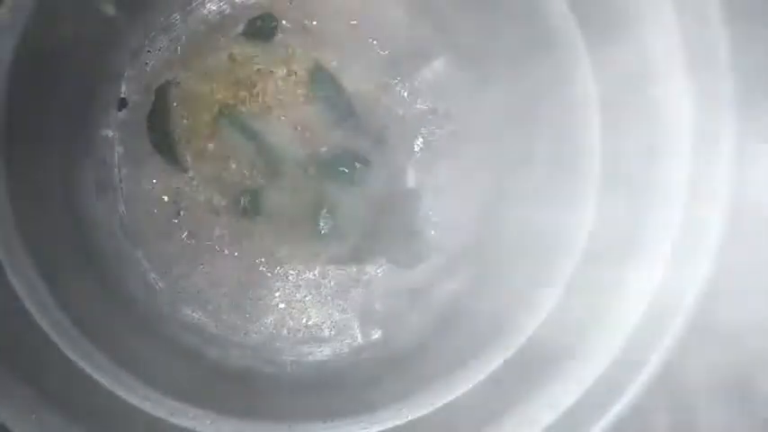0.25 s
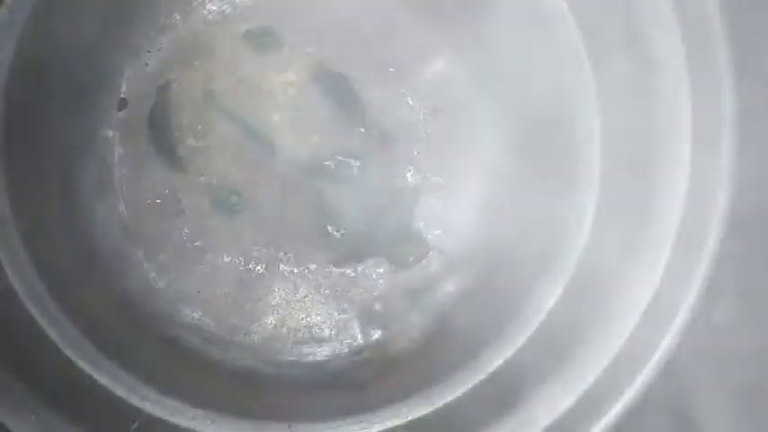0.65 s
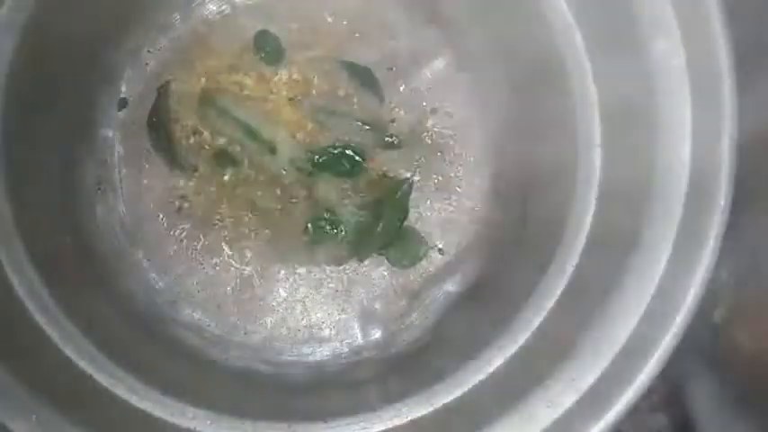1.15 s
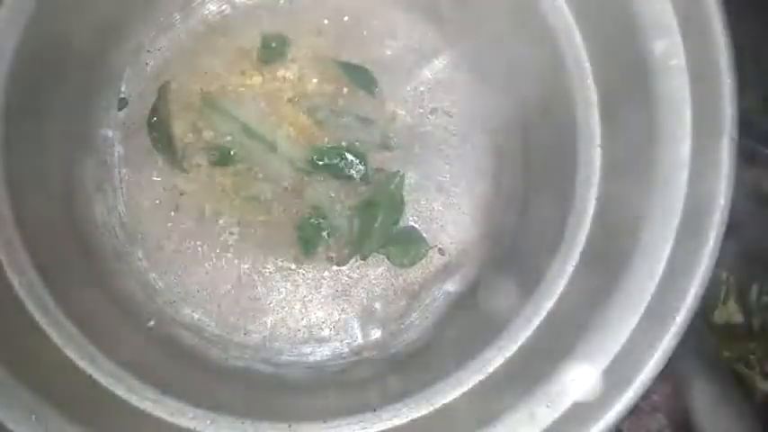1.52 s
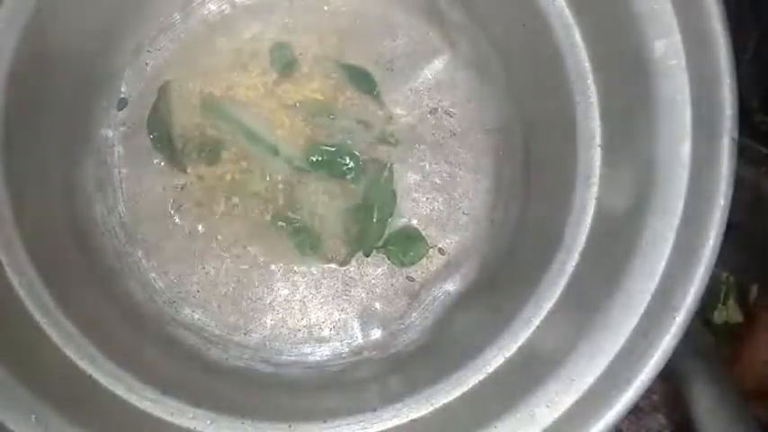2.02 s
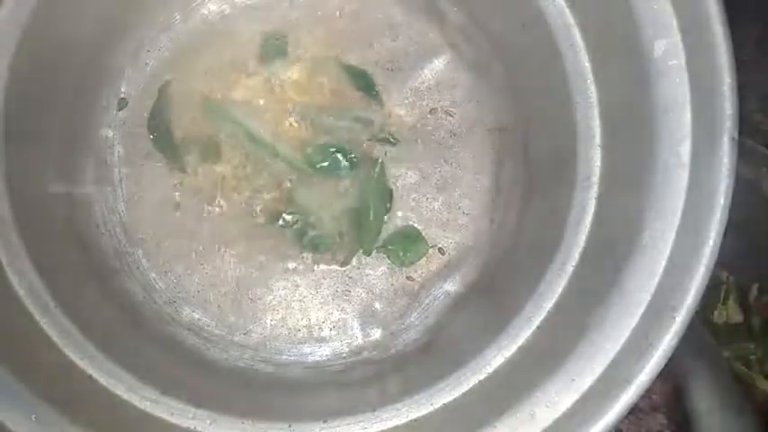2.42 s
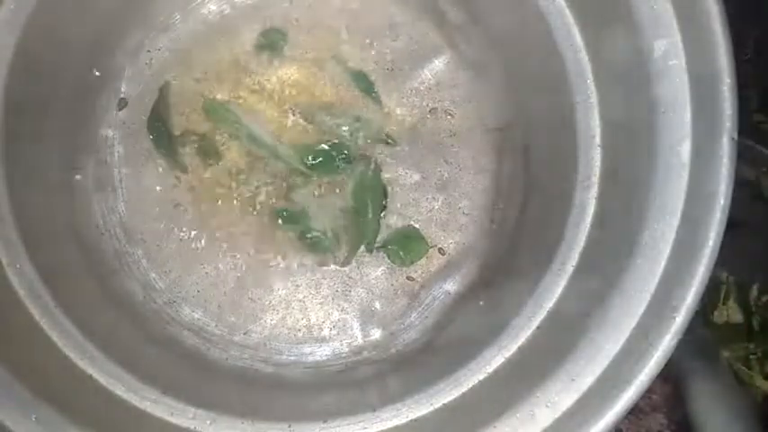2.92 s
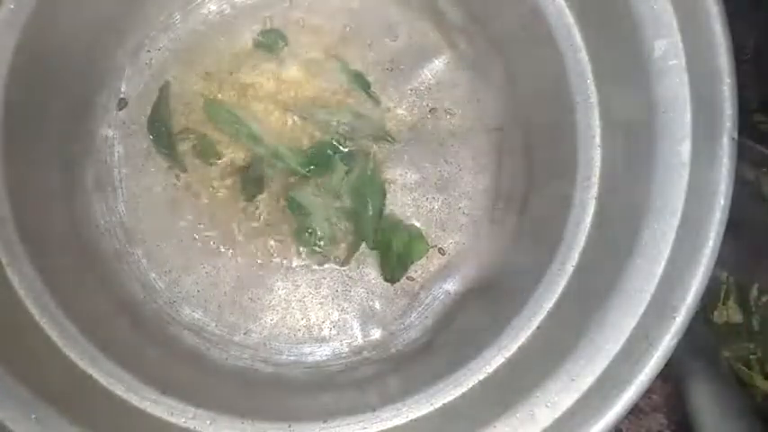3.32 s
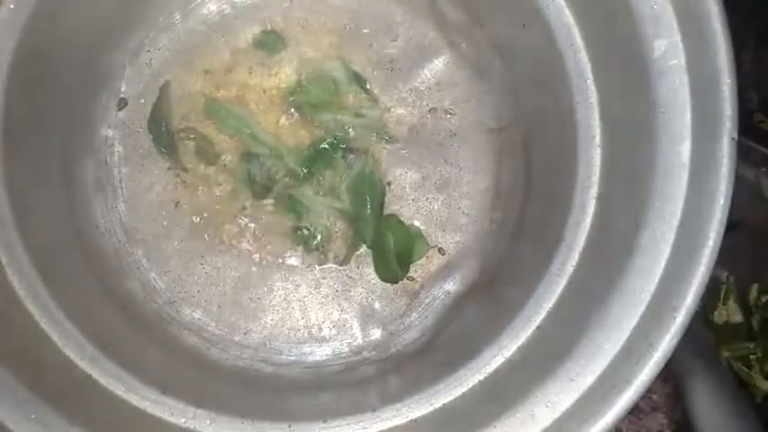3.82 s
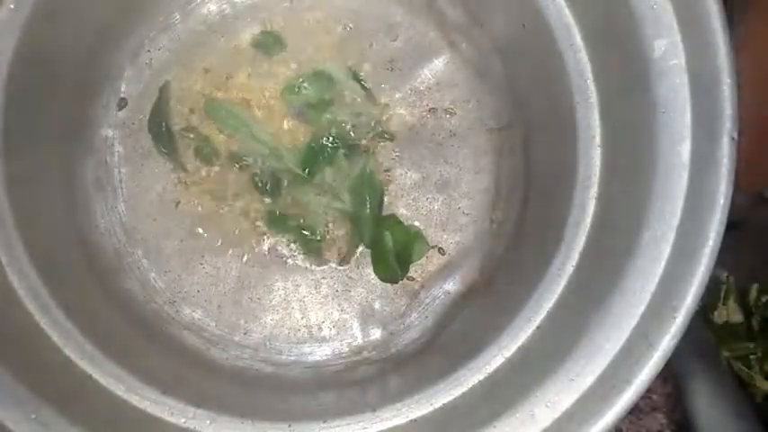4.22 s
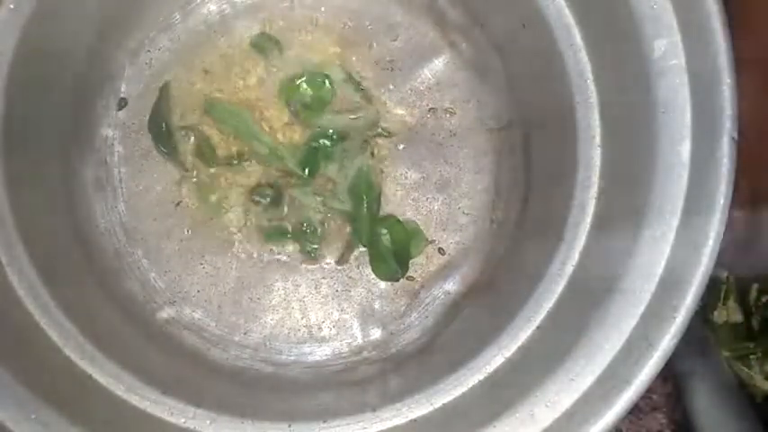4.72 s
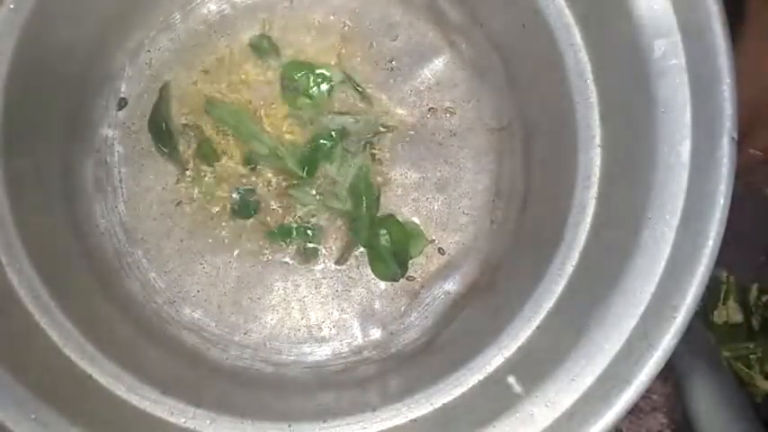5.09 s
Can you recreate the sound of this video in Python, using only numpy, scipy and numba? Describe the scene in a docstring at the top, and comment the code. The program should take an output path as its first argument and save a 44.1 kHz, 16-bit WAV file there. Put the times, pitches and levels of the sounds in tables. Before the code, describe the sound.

Leaves and seeds fry in hot oil at the bottom of a metal pot, popping, crackling and fizzing with hollow ringing bursts.

```python
"""Leaves and seeds fry in a little hot oil at the bottom of a deep metal pot, a phone held above it.
From the start small steam bubbles simmer, over a low kitchen rumble and under a fine treble fizz of droplets.
Soon louder bursts pop one by one: each is a short gliding tone that rings the pot and leaves a swarm
of smaller bubbles. Smaller snaps crackle at random, and now and then a droplet spits: a brief noise puff."""
import sys
import numpy as np
from scipy import signal
from scipy.fft import rfft, irfft
from scipy.io import wavfile
from scipy.ndimage import uniform_filter1d
from numba import njit

SR = 44100
rng = np.random.default_rng(int(sys.argv[2]) if len(sys.argv) > 2 else 0)


def transcribe(u):
    """Save the signal u as a 16-bit wav file named by the first command-line argument.

    u: samples, shape (n,) or (channels, n), limited to [-1, 1]; the rate is SR.
    q: integer samples, one column per channel.
    """
    v = np.clip(np.atleast_2d(u).T, -1, 1)
    q = np.round(v * 32767).astype(np.int16)
    wavfile.write(sys.argv[1], SR, q)


N = 235934

# droplets spat out of the oil: t/s, peak level/dB, middle pitch f/Hz
SPIT_TIMES = [(0.1376, -44, 8550), (0.8779, -54, 14100), (1.3384, -49, 13700), (1.475, -41, 13600),
              (1.7245, -46, 13900), (1.9284, -47, 13500), (2.093, -52, 13900), (2.3236, -44, 10000),
              (2.3476, -39, 13500), (2.7955, -53, 10300), (2.8147, -39, 13400), (2.9672, -46, 12600),
              (2.9866, -46, 13200), (3.0859, -47, 13300), (3.1168, -51, 13550), (3.1522, -36, 14000),
              (3.2656, -53, 13600), (3.2834, -47, 13900), (3.4036, -51, 9440), (3.467, -46, 14100),
              (3.555, -54, 13000), (3.62, -43, 13300), (3.678, -46, 11900), (3.7998, -45, 8200),
              (4.0168, -47, 7710), (4.0726, -45, 13800), (4.1924, -43, 9180), (4.4996, -47, 9240),
              (4.5625, -46, 12360), (4.9267, -54, 13900), (4.9392, -51, 13400), (4.9926, -43.5, 13100),
              (5.0644, -44, 14000), (5.228, -44, 12800)]


def undb(db):
    """Turn decibels into a plain factor."""
    return 10 ** (np.asarray(db) / 20)


def curves(table):
    """Join the points of each table column by straight lines, one value a sample."""
    s, *columns = np.transpose(table)
    return [np.interp(np.arange(N) / SR, s, c) for c in columns]


def colour(x, points):
    """Shape the spectrum by (Hz, dB) points, then scale to rms 1."""
    hz, db = np.transpose(points)
    f = np.arange(len(x) // 2 + 1) * SR / len(x)
    gain_db = np.interp(np.log(f + 1), np.log(hz), db, left=-90)
    y = irfft(rfft(x) * undb(gain_db), len(x))
    return y / y.std()


def walk(rate):
    """Draw a random level every 1 / rate seconds and smooth the steps twice; spread 1."""
    k = int(SR / rate)
    steps = np.repeat(rng.standard_normal(N // k + 1), k)[:N]
    x = uniform_filter1d(uniform_filter1d(steps, k), k)
    return x / x.std()


def band(x, lo_hz, hi_hz):
    """Keep only the sound between two pitches."""
    return signal.sosfilt(signal.butter(2, [lo_hz, hi_hz], "band", fs=SR, output="sos"), x)


@njit
def bubbles(start, size, hz, cycles, glide, n):
    """Each bubble swells, rings for a few cycles while its pitch rises, and dies."""
    out = np.zeros(n)
    for k in range(len(start)):
        tau = cycles[k] / hz[k] * SR / 5  # decay time in samples
        phase, i0 = 0., int(start[k] * SR)
        for i in range(min(int(12 * tau), n - i0)):
            u = i / tau
            phase += 2 * np.pi * hz[k] / SR * (1 + glide[k] * u)
            swell = u * u / 4 * np.exp(2 - u)  # peaks at 1
            out[i0 + i] += size[k] * swell * np.sin(phase)
    return out


def rumble():
    """Burner and kitchen: low noise in three bands that waver on their own."""
    # path of the rumble: t/s, lower bass level/dB, upper bass level/dB (both before wavering)
    rumble_path = [(0.0, -80, -74), (0.37, -76, -78.5), (0.51, -78, -71.5), (0.68, -72, -67.5),
                   (0.83, -65.5, -69), (0.97, -79, -72.5), (1.04, -72, -74), (1.34, -73.5, -72.5),
                   (1.37, -89, -85), (1.7, -72, -65), (2.08, -77.5, -81.5), (2.11, -69, -62.5),
                   (2.29, -81, -76.5), (2.59, -80, -79), (2.77, -71, -76), (2.92, -73, -72),
                   (3.05, -65, -66.5), (3.32, -75, -73), (3.75, -62, -69.5), (3.83, -78, -77.5),
                   (4.8, -77, -77), (4.86, -76.5, -76.5), (5.12, -76.5, -84.5), (5.16, -73.5, -67),
                   (5.35, -75, -69.5)]
    # colour of the noise: f/Hz, level per Hz/dB (relative)
    rumble_colour = [(12, -30), (20, 12), (32, 0), (60, -7), (87, -7), (113, -3), (140, 0.5), (242, -6.5),
                     (289, 1.5), (327, -4.5), (366, -10.5), (400, -49), (520, -40), (880, -120)]
    lower_db, upper_db = curves(rumble_path)
    x = colour(rng.standard_normal(N), rumble_colour)
    deep, lower, upper = band(x, 15, 48), band(band(x, 48, 190), 40, 400), band(x, 180, 400)
    deep = deep / deep.std() * undb(-100 + 2 * walk(3))
    lower = lower / lower.std() * undb(lower_db + 2.5 * walk(12))
    upper = upper / upper.std() * undb(upper_db + 3 * walk(12))
    return deep + lower + upper


def simmer(count=1500, bunch_db=1.1, fine_db_per_oct=-4, fine_drift_db=0.6):
    """Every kind of small bubble bursts a few hundred times a second, louder in bunches, some louder still."""
    # bubbles all over the oil: t/s, level/dB (before the pot, shared by all kinds)
    simmer_path = [(0.0, -54.5), (0.42, -55.5), (0.58, -54.5), (0.68, -58), (0.78, -53), (0.92, -53),
                   (1.05, -58), (1.41, -57.5), (1.65, -58), (2.5, -61), (2.58, -65.5), (2.7, -62),
                   (3.2, -55.5), (3.84, -58.5), (4.47, -61.5), (4.68, -64), (4.96, -59.5), (5.35, -63)]
    # kinds of bubble: middle pitch f/Hz, spread/octaves, relative level/dB before the tilt,
    # size scatter/dB, middle ring/cycles, pitch rise per decay time/share
    bubble_kinds = [(520, .3, -9.5, 3.0, 2.5, .02), (1150, .25, -1, 2.8, 2.5, .02),
                    (1950, .25, -5, 3.6, 3.5, .03), (2800, .17, -4, 4.4, 6.0, .03),
                    (4900, .25, -13, 8.0, 11.0, .012)]
    db, = curves(simmer_path)
    tilt_db = fine_db_per_oct + fine_drift_db * walk(7)  # the share of finer bubbles drifts
    out, together = 0, walk(21.14)
    for middle_hz, spread_oct, kind_db, scatter_db, cycles, glide in bubble_kinds:
        when, length = rng.random((count, 2)).T
        pitch = rng.standard_normal(count)
        loud = np.minimum(rng.exponential(size=count), 4)
        bunch = (together + walk(30))[(when * (N - 1)).astype(int)]
        size = undb(scatter_db * loud + bunch_db * bunch)
        hz = middle_hz * 2 ** (spread_oct * pitch)
        x = bubbles(when * N / SR, size, hz, cycles * (.5 + length), glide + 0 * when, N)
        octaves = np.log2(middle_hz / bubble_kinds[1][0])  # from the second kind
        out = out + x / x.std() * undb(kind_db + tilt_db * octaves)
    return out * undb(db)


def fizz(scatter_db=5.2, smear_s=0.001, steady=6.0, flicker_db=1.2, own_db=1.4, surge_db=1.5, surge_s=0.04):
    """Droplets tick over a flickering hiss, each range a little on its own. Returns mid and side."""
    # path of the fizz: t/s, level below 6 kHz/dB (gauged from 3.5 kHz up), level 6 to 10 kHz/dB,
    # level above 10 kHz/dB (all before flicker and surges)
    fizz_path = [(0.0, -60.5, -64.5, -64), (0.12, -87, -71, -73), (0.15, -63, -63.5, -67),
                 (0.22, -70, -69, -74), (0.27, -63.5, -68, -62.5), (0.52, -68.5, -70, -69),
                 (0.7, -68, -74, -71.5), (0.85, -69.5, -70.5, -66), (0.9, -71, -63.5, -61),
                 (1.0, -65, -58.5, -59), (1.1, -68, -61.5, -63), (1.25, -65.5, -63.5, -58),
                 (1.45, -67, -66, -60), (1.7, -67.5, -71, -63.5), (1.95, -70.5, -74.5, -70),
                 (2.06, -75, -79, -73), (2.1, -72, -67.5, -61), (2.3, -75.5, -70.5, -65),
                 (2.36, -68, -66, -63), (2.45, -71.5, -71.5, -66), (2.5, -68.5, -69, -62.5),
                 (2.6, -71, -71, -67), (2.77, -76, -80, -74), (2.82, -72.5, -70, -67),
                 (2.92, -72, -71.5, -69), (3.08, -70, -69, -65), (3.17, -71.5, -66.5, -62.5),
                 (3.37, -72.5, -77, -70.5), (3.46, -73.5, -67.5, -66), (3.6, -69.5, -78, -70),
                 (3.65, -68, -70, -66), (3.76, -72.5, -70, -70), (3.8, -73, -67, -65),
                 (3.96, -68, -69.5, -67), (4.2, -75, -67, -68), (4.32, -70.5, -64.5, -66.5),
                 (4.48, -71, -75, -72), (4.52, -74.5, -66, -71), (4.9, -70, -75, -70),
                 (5.0, -71.5, -69.5, -64), (5.35, -70.5, -73.5, -71)]
    # colour of the hiss: f/Hz, level per Hz/dB (relative)
    fizz_colour = [(1650, -3.5), (2800, -0.5), (3490, -10.5), (4110, -7.5), (4550, -13), (11500, -5),
                   (13700, 2), (14400, -10.5)]
    low_db, *treble_db = curves(fizz_path)
    # each spit sets off a brief surge of fizz
    spit_s = np.transpose(SPIT_TIMES)[0]
    lengths = np.diff([0, *(spit_s * SR).astype(int), N])
    since = np.arange(N) / SR - np.repeat([-9, *spit_s], lengths)  # seconds since the last spit
    stir_db = surge_db * np.exp(-since / surge_s) + flicker_db * walk(24.9)
    hiss = np.array([colour(rng.standard_normal(N), fizz_colour) for _ in range(2)])
    below = [signal.sosfiltfilt(signal.butter(4, hz, fs=SR, output="sos"), hiss)
             for hz in (6000, 8000, 10000, 12000)] + [hiss]
    out = below[0] / band(below[0], 3500, 6000).std() * undb(low_db + stir_db / 2 + own_db * walk(13))
    for db, three in zip(treble_db, [below[:3], below[2:]]):
        loud = np.minimum(rng.exponential(size=N), 4)
        ticks = (rng.random(N) < 400 / SR) * undb(scatter_db * loud)  # about 400 a second
        gate = signal.lfilter([1], [1, -np.exp(-1 / (smear_s * SR))], ticks) + steady
        # the difference of two low-passed copies is the band between them
        x = gate * sum((hi - lo) * undb(own_db * walk(31)) for lo, hi in zip(three, three[1:]))
        out = out + x / x.std() * undb(db + stir_db)
    return out


def crackle(count=420, peak_db=-49, scatter_db=1.5, middle_hz=2000, spread_oct=0.55, cycles=2.76):
    """Smaller bubbles snap at random moments, with scattered pitch, length and loudness."""
    when, length, loud = rng.random((count, 3)).T
    hz = middle_hz * 2 ** (spread_oct * rng.standard_normal(count))
    size = undb(peak_db - scatter_db * np.log(np.maximum(loud, .05)))
    return bubbles(when * N / SR, size, np.minimum(hz, 7000.), cycles * (0.29 + length), 0.0082 + 0 * when, N)


def pops(count=12, swarm_s=.022, fall_db=128.0, spread_oct=0.386, sink_oct=-0.045, ring_s=0.0013, lead_s=0.002):
    """A few bubbles break early, then each burst, then a swarm of scattered pitch that thins out."""
    # loud bursts of steam: t/s, peak level/dB (before the pot), bubble pitch f/Hz, ring/cycles
    burst_list = [(0.05, -37, 1090, 2.7), (0.143, -37, 1290, 3), (0.155, -29, 1070, 1.76),
                  (0.331, -40, 2680, 4.7), (0.283, -37, 1150, 2.9), (0.398, -37, 1175, 3),
                  (0.411, -36, 1270, 2.8), (0.412, -39, 2750, 7), (0.488, -40.5, 1560, 13),
                  (0.695, -23, 1070, 1.7), (0.695, -29, 1810, 3.2), (0.701, -38, 1170, 2.6),
                  (0.711, -34, 1140, 3.4), (0.797, -42, 2950, 6.9), (0.83, -42.5, 3080, 4.7),
                  (0.88, -41, 2730, 9), (0.896, -24, 2190, 3.9), (1.139, -32.5, 457, 1.2),
                  (1.145, -33, 586, 1.27), (1.1451, -37.5, 2990, 5.3), (1.218, -42, 3050, 8),
                  (1.23, -44, 2250, 5.5), (1.233, -36.5, 1520, 3.8), (1.239, -41, 3000, 7.8),
                  (1.249, -31.5, 500, 0.95), (1.265, -30.5, 1300, 3.8), (1.266, -41, 1980, 4.2),
                  (1.286, -46, 2440, 6.3), (1.311, -36, 1770, 2.7), (1.36, -35.5, 2090, 7.5),
                  (1.411, -36.5, 2090, 11), (1.488, -28, 1756, 4.9), (1.489, -28.5, 2290, 6.4),
                  (1.4883, -24.5, 1390, 1.23), (1.5, -36, 1150, 3), (1.563, -30, 1970, 2.2),
                  (1.573, -34.5, 1680, 1.9), (1.614, -31.5, 1890, 12.4), (1.626, -28.5, 530, 0.91),
                  (1.63, -36, 1390, 2.6), (1.66, -37, 1970, 2.9), (1.667, -28, 1740, 1.4),
                  (1.7, -25.5, 1430, 2.4), (1.742, -26.5, 1660, 2.3), (1.864, -27.5, 2000, 3.1),
                  (1.931, -40.5, 3000, 4.4), (1.989, -36.5, 1660, 2.6), (2.074, -43, 2470, 5.3),
                  (2.075, -37.5, 980, 2.5), (2.086, -38.5, 975, 2.2), (2.11, -36, 460, 0.63),
                  (2.116, -26, 540, 0.83), (2.119, -38.5, 1300, 2), (2.142, -35.5, 1950, 2.1),
                  (2.337, -16.5, 1800, 3.4), (2.339, -42, 1500, 3.6), (2.351, -38.5, 650, 1.5),
                  (2.4, -35, 617, 1.1), (2.404, -32.5, 1160, 2), (2.416, -29, 1980, 3.2),
                  (2.591, -34, 1293, 4.3), (2.671, -41, 2970, 5.4), (2.706, -41.5, 1380, 5.1),
                  (2.708, -43.5, 3030, 9), (2.723, -46.5, 2940, 9.8), (2.723, -46, 1300, 2),
                  (2.725, -42, 490, 1.8), (2.817, -39, 2980, 12.5), (2.829, -35, 1240, 0.7),
                  (2.999, -41.5, 2700, 8.7), (3.054, -33, 2680, 4.7), (3.055, -31.5, 1500, 2),
                  (3.09, -32.5, 2310, 1.8), (3.154, -28.5, 1520, 1.5), (3.158, -19.5, 1530, 2.37),
                  (3.173, -31, 1320, 5.3), (3.201, -30, 1220, 2.7), (3.246, -27, 1400, 0.77),
                  (3.286, -36.5, 2870, 3.4), (3.29, -33.5, 960, 2.1), (3.304, -30.5, 1410, 1.4),
                  (3.403, -30, 1300, 2.5), (3.473, -27, 996, 0.87), (3.564, -37.5, 1320, 7.6),
                  (3.614, -27.5, 1070, 2.6), (3.649, -22.5, 1250, 2.3), (3.662, -24, 1240, 2.1),
                  (3.674, -34, 1130, 3), (3.716, -27.5, 536, 1.63), (3.723, -21, 1080, 1.45),
                  (3.754, -30.5, 1100, 1.2), (3.814, -43.5, 1270, 3.3), (3.856, -26, 1860, 1.34),
                  (3.918, -26, 2440, 3.3), (3.921, -33, 590, 2.24), (3.926, -34.5, 1850, 3.5),
                  (3.926, -33.5, 980, 3.3), (3.964, -30.5, 1360, 1.9), (3.973, -34.5, 1790, 7.4),
                  (4.075, -35.5, 1570, 2.2), (4.12, -32.5, 2960, 6.4), (4.162, -25, 1860, 1.7),
                  (4.178, -17.5, 1890, 2.7), (4.189, -32, 1910, 14), (4.199, -21.5, 1300, 1.6),
                  (4.214, -30, 1050, 1.9), (4.281, -30, 750, 0.85), (4.295, -28.5, 2080, 4.2),
                  (4.297, -36, 1330, 4.3), (4.298, -29.5, 2460, 3.9), (4.33, -32, 1850, 1.6),
                  (4.379, -32, 5420, 8.5), (4.383, -29, 1020, 1), (4.397, -34.5, 1015, 4.3),
                  (4.407, -53, 1120, 4.2), (4.467, -44, 2680, 8.3), (4.49, -38, 5300, 7.1),
                  (4.567, -29, 2840, 8), (4.702, -34.5, 2970, 2.3), (4.706, -33.5, 750, 0.8),
                  (4.776, -32.5, 2680, 4.6), (4.781, -31.5, 565, 1.16), (4.789, -19, 1320, 2),
                  (4.799, -27, 1190, 2.2), (4.805, -32, 1166, 6.3), (4.818, -33, 1170, 3.9),
                  (4.819, -41, 2820, 6.1), (4.848, -43.5, 2600, 3.2), (4.854, -32.5, 1430, 2.9),
                  (4.871, -40.5, 5030, 14), (4.938, -41, 2730, 9.3), (4.941, -37, 1240, 1.7),
                  (4.971, -47, 2650, 7), (5.011, -32.5, 2210, 6), (5.014, -34.5, 1150, 2.5),
                  (5.046, -42, 2690, 5.7), (5.047, -36.5, 1220, 3.6), (5.068, -33.5, 2390, 12),
                  (5.068, -37.5, 1130, 2.6), (5.092, -32, 1220, 1.4), (5.165, -42, 2920, 7.7),
                  (5.177, -31.5, 2610, 6.6), (5.177, -35, 1260, 2), (5.229, -42, 2890, 9.7),
                  (5.23, -37.5, 1800, 4.5), (5.23, -40.5, 1060, 2.7), (5.323, -36, 2030, 2.1),
                  (5.334, -21.5, 2050, 2.4), (5.343, -29.5, 1220, 1.6)]
    s, db, hz, cycles = (c[:, None] for c in np.transpose(burst_list))
    shape = (len(s), count)
    wait = 0.004 + swarm_s * rng.exponential(size=shape)
    size, pitch = rng.standard_normal(shape), rng.standard_normal(shape)
    # the swarm starts from -47 dB for a burst of -30 dB, shares 0.77 of a louder burst's gain, and fades
    swarm_db = -47 + 0.77 * (db + 30) - fall_db * wait
    swarm_hz = hz * 2 ** (sink_oct + spread_oct * pitch)
    longer = cycles + ring_s * hz  # rings on a little longer than the burst
    swarm = [s + wait, size * undb(swarm_db), swarm_hz, longer + 0 * wait]
    # three small bubbles just ahead of the burst, fainter the earlier they break
    early, bend = wait[:, :3] / swarm_s, pitch[:, -3:]
    lead_db = db - 15 - 4.4 * early
    lead = [np.maximum(s - lead_s * early, 0), undb(lead_db), hz * 2 ** (0.29 * bend), longer + 0 * early]
    burst = [s, undb(db), hz, cycles]
    rows = [np.concatenate([x.ravel() for x in parts]) for parts in zip(burst, swarm, lead)]
    return bubbles(*rows, np.full(len(rows[0]), .01), N)


def thump(bursts):
    """The body of low bursts, carried by the pot's floor below its first mode."""
    return undb(-6.5) * band(band(bursts, 132, 372), 97, 340)


def pot(x, dull_hz=5000, muffle_hz=3500, direct_db=-1.5, echo_db=-8, ring_db=-39.5, low_hz=439.2):
    """The metal pot adds ringing modes and quick echoes between its walls to the direct sound."""
    # wall and air modes, one column a table: pitch f/Hz; relative strength/dB; time to fall 60 dB/s
    mode_hz = [425, 476, 545, 603, 750, 835, 884, 1040, 1100, 1160, 1270, 1390, 1520, 1620, 1700, 1820,
               1890, 2045, 2170, 2340, 2490, 2660, 2730, 3015, 3080, 3250]
    mode_db = [-1, -8, -4.5, -12.5, -10.5, -5, -3, 2.5, -7, 0.5, -1, 1, -21.5, -21, -48, 0.5, -16, -8.5,
               -11, 4.5, -53, 6, -52, -5.5, -9, -7.5]
    mode_t60 = [.044, .12, .06, .12, .12, .074, .12, .033, .14, .074, .05, .045, .12, .1, .018, .04, .1,
                .16, .1, .03, .1, .036, .036, .04, .07, .03]
    # echoes between the walls: round trip t/s, share sent back (held to 0.8 at most below)
    wall_echoes = [(.0005, 0.053), (.0009, 0.65), (.0016, 0.82)]
    t = np.arange(SR // 4) / SR
    click = (t == 0).astype(float)
    ring = 0
    for k, (hz, db, t60) in enumerate(zip(mode_hz, mode_db, mode_t60)):
        fade = np.exp(-np.log(1000) * t / t60)
        ring = ring + (-1) ** k * undb(db) * fade * np.sin(2 * np.pi * hz * t)
    echo = signal.lfilter(*signal.butter(1, dull_hz, fs=SR), click)
    for trip_s, share in wall_echoes:
        gap, share = np.zeros(int(trip_s * SR) - 1), min(share, .8)
        echo = signal.lfilter([-share, *gap, 1], [1, *gap, -share], echo)  # all-pass echo
    response = undb(direct_db) * click + undb(echo_db) * echo + undb(ring_db) * ring
    near = signal.fftconvolve(x, response)[:N]
    # the oil and the deep walls muffle the top
    near = signal.lfilter(*signal.butter(3, muffle_hz, fs=SR), near)
    # the pot radiates little below its first mode
    return signal.sosfilt(signal.ellip(4, .5, 19, low_hz, "high", fs=SR, output="sos"), near)


def spits(fade_s=0.003):
    """Each spat droplet is a short puff of high noise around its pitch. Returns mid and side."""
    out = np.zeros((2, N))
    t = np.arange(SR // 50) / SR
    shape = (1 - np.exp(-t / 0.0004)) * np.exp(-t / fade_s)
    for s, spit_db, hz in SPIT_TIMES:
        noise = rng.standard_normal((2, len(t))) * shape
        puff = band(noise, max(0.6 * hz, 6000), min(1.6 * hz, 18000))
        k = int(s * SR)
        out[:, k:k + len(t)] += undb(spit_db) * puff / np.abs(puff).max()
    return out


def scene(wide_hz=5900, wide_db=-4.5):
    """Everything in the middle; only the high fizz is wide, the rest differs faintly between the ports."""
    hiss, wide = fizz() + spits()
    low = rumble()
    bursts = pops()
    mid = pot(bursts + crackle() + simmer()) + thump(bursts) + hiss + low
    # above wide_hz the phone's two microphone ports hear the fizz differently
    side = undb(wide_db) * signal.sosfilt(signal.butter(6, wide_hz, "high", fs=SR, output="sos"), wide)
    # faint shifted copies: the rumble by 1 s, the middle by 20 ms
    side = side + undb(-26) * np.roll(low, SR) + undb(-46) * np.roll(mid, SR // 50)
    return np.array([mid + side, mid - side])


def record(dry):
    """The phone cuts the top steeply above 14250 Hz."""
    return signal.sosfilt(signal.ellip(10, .2, 64, 14250, fs=SR, output="sos"), dry)


dry = scene()
out = record(dry)
transcribe(out)
```